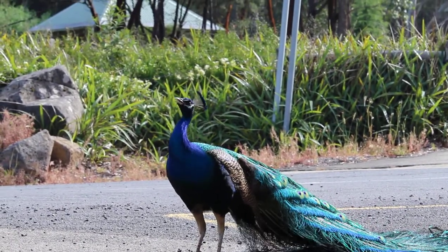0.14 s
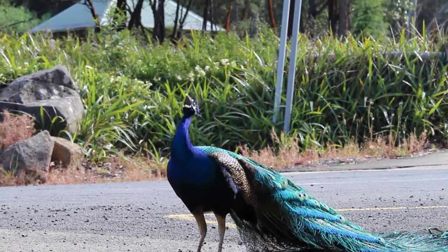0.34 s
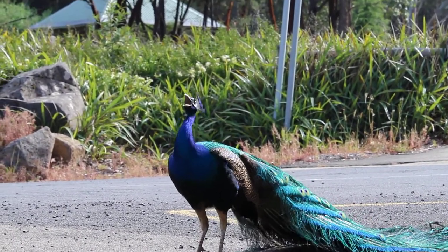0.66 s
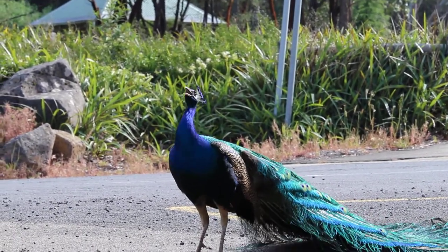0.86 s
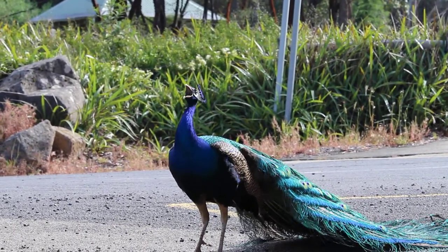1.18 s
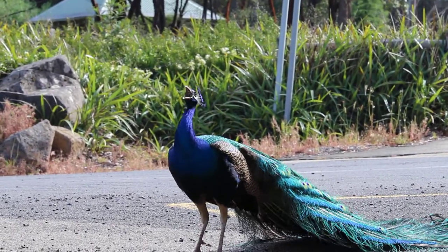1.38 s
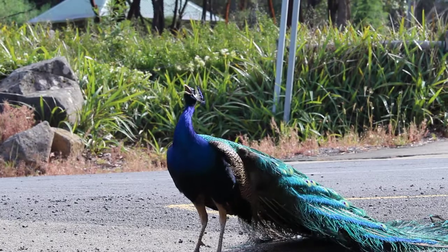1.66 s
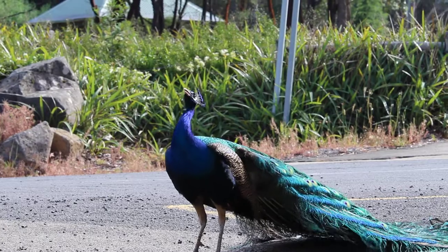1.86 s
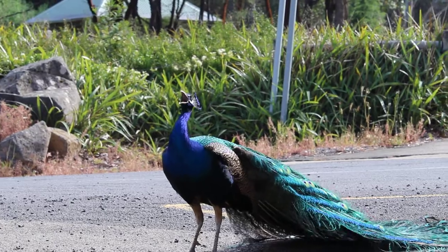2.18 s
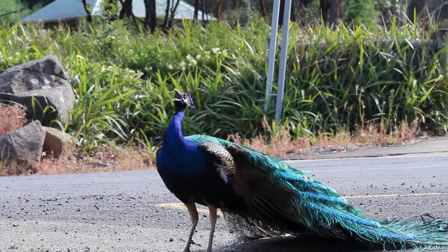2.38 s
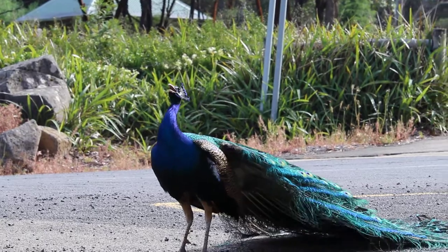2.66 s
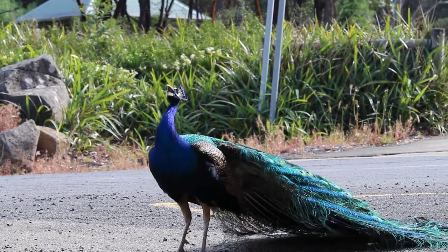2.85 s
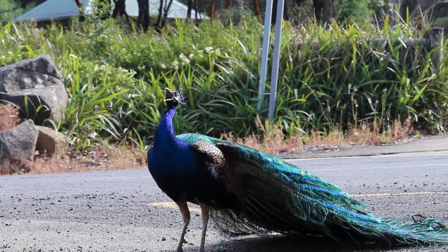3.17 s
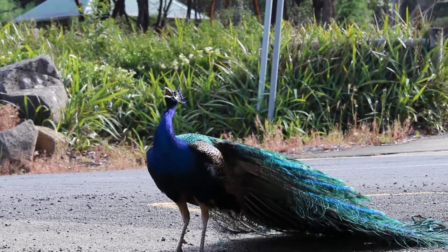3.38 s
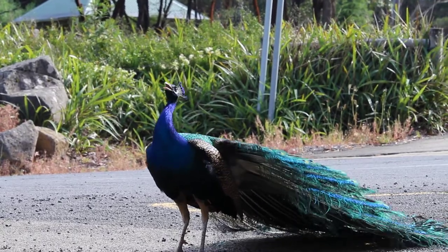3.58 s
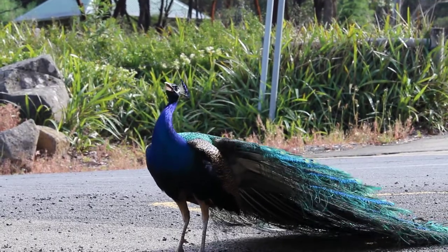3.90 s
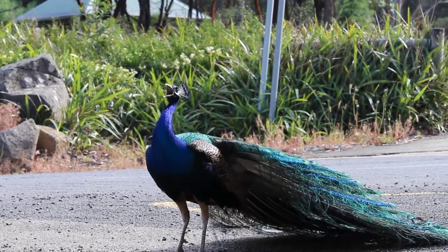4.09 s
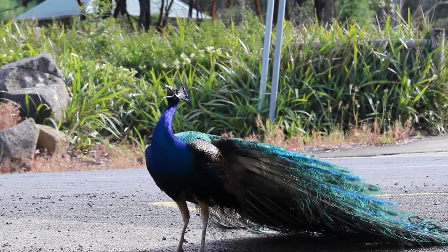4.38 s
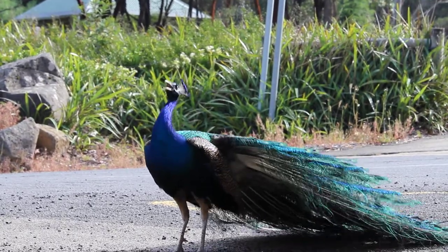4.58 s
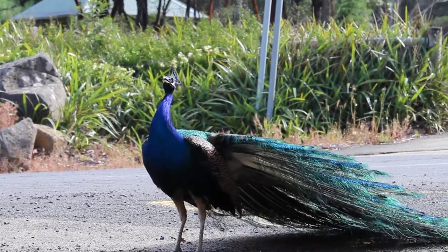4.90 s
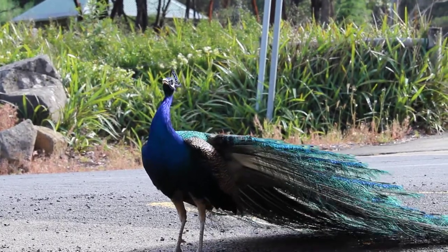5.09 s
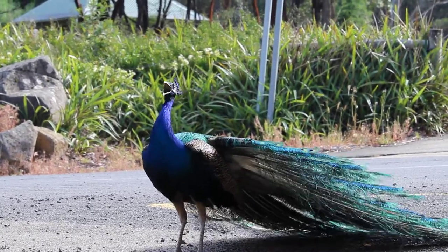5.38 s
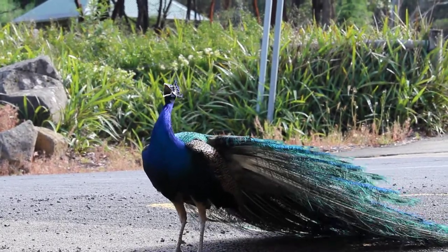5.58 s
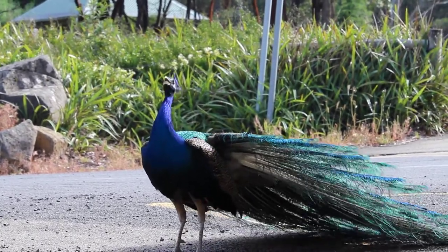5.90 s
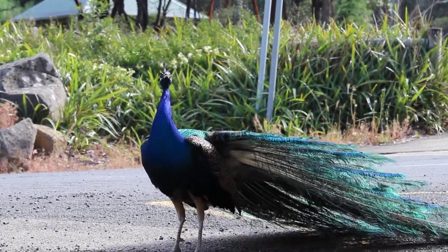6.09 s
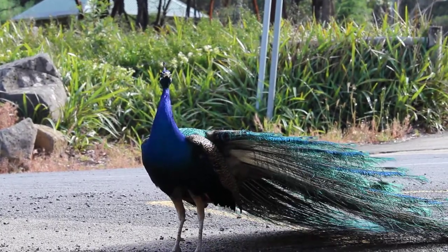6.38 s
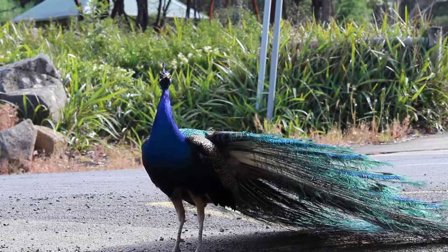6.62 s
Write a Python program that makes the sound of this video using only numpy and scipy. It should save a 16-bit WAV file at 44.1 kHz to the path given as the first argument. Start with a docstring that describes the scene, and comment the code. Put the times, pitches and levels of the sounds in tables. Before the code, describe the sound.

Six piercing, nasal peacock cries arch up and down about once a second, echoing off the roadside over low rumble and light microphone wind.

```python
"""Peacock beside a road

A peacock gives six loud arched calls: a stack of overtones that rises and falls through windpipe and beak, with
strong echoes off the road and nearby surfaces. Behind it: filtered-noise traffic, an idling engine summed from
its orders, puffs and roar of wind on the microphone, and a cricket as a pulsed high tone.
An automatic gain control ducks during each call and creeps back up."""
import sys
import numpy as np
from scipy import signal
from scipy.fft import rfft, irfft, next_fast_len
from scipy.io import wavfile
from scipy.ndimage import uniform_filter1d, map_coordinates

SR = 44100
rng = np.random.default_rng(int(sys.argv[2]) if len(sys.argv) > 2 else 0)


def store_wav(level_fs):
    """Save 16-bit WAV to argv[1]."""
    pcm = np.round(np.clip(np.atleast_2d(level_fs), -1, 1) * 32767)
    wavfile.write(sys.argv[1], SR, pcm.T.astype(np.int16))


def to_linear_factor(level_db):
    """Convert decibel levels (scalar or array-like) to linear amplitude factors."""
    exponent = np.asarray(level_db, float) / 20
    return 10 ** exponent


N = 297523


def along(points, hz):
    """(frequency [Hz], value) points read on a log frequency axis."""
    f, v = np.transpose(points)
    return np.interp(np.log(hz + 1), np.log(f + 1), v)


def wobble(rate_hz):
    """A smooth random curve through rate_hz knots a second."""
    knots = rng.standard_normal(int(N * rate_hz / SR) + 4)
    return map_coordinates(knots, [np.arange(N) * rate_hz / SR])


def filtered(x, response):
    """x times a complex response of frequency."""
    m = next_fast_len(N + SR // 2)
    return irfft(rfft(x, m) * response(np.fft.rfftfreq(m, 1 / SR)), m)[:N]


def noise(spectrum):
    """Coloured noise of rms 1."""
    x = filtered(rng.standard_normal(N), lambda hz: to_linear_factor(along(spectrum, hz)))
    return x / np.std(x)


def bump(t, centre_s, half_s):
    """Bell curve in time with peak 1."""
    return np.exp(-((t - centre_s) / half_s) ** 2)


def posture(pitch_hz, past):
    """Effort, treble and beak resonance [dB] follow pitch, on one path going up and another going down."""
    # pitches at which the settings are given [Hz]
    steps_hz = [610, 660, 700, 735, 760, 785, 810, 830, 850]
    # settings at those pitches: (effort [dB], treble [dB], beak resonance [dB])
    rising = [(-7, -7.5, -22), (-8, -9.5, -24), (-6.5, -2, -30.5), (-5.5, -4, 2.5), (-4.5, -8.5, 8.5),
              (-3.5, -5, -1.5), (-3.5, -2, -10), (-11, -0.5, -9), (-4.5, 0.5, -29)]
    falling = [(-10, -18, -2), (-10, -11, 2), (-12, -3, 10), (-8.5, -1, -10), (-5.5, -4.5, 2.5),
               (-10, 3, 16.5), (-5, -2.5, 7.5), (-6, 3, -0.5), (-12.5, 0, -55)]
    blends = []
    for up, down in zip(np.transpose(rising), np.transpose(falling)):
        up_db, down_db = np.interp(pitch_hz, steps_hz, up), np.interp(pitch_hz, steps_hz, down)
        blends.append((1 - past) * up_db + past * down_db)
    return blends


def tract_db(hz, treble_db, beak_db, brass_db):
    """Windpipe and open beak boost or damp each overtone by its frequency."""
    # windpipe colour: (frequency [Hz], gain [dB])
    windpipe = [(600, 15.5), (740, -10.5), (840, 4), (1250, 1), (1380, 2), (1500, -0.5), (1690, -3.5),
                (1900, -2), (2100, -1), (2300, 2.5), (2480, 1.5), (2800, 1), (3080, -1), (3350, -4),
                (4100, -4), (4600, -0.5), (5300, -11.5), (6500, 0.5), (7400, 1.5), (8600, -4), (9200, -2.5),
                (11000, -7.5), (15000, -18.5)]
    mouth_hz, mouth_width_hz = 3080, 330
    brass_hz, brass_width_hz = 8500, 2200
    colour_db = along(windpipe, hz)
    colour_db = colour_db + np.clip(beak_db, -12, 10) * np.exp(-((hz - mouth_hz) / mouth_width_hz) ** 2)
    colour_db = colour_db + treble_db * np.clip(hz / 3500 - 1, 0, 1)
    return colour_db + brass_db * np.exp(-((hz - brass_hz) / brass_width_hz) ** 2)


def peacock():
    """Steady membrane cycles as overtones through windpipe and beak, with a little breath pulsing at the pitch."""
    # the voice: (multiple of the pitch, level [dB])
    overtones = [(1, -13.5), (2, -3.5), (3, -0.5), (4, -8.5), (5, -10), (6, -12.5), (7, -13), (8, -14),
                 (9, -18), (10, -22.5), (11, -18.5), (12, -22.5), (13, -22), (14, -21.5), (15, -22),
                 (16, -30), (17, -26), (18, -33), (19, -32), (20, -44), (21, -44), (22, -45), (23, -46)]
    # pitch arch of each call: (time [s], pitch [Hz])
    arches = [
        [(.183, 617), (.204, 657), (.231, 717.4), (.288, 752), (.336, 732), (.354, 773), (.387, 812),
         (.435, 836.8), (.501, 838), (.573, 812), (.726, 749.7), (.752, 673)],
        [(1.045, 600), (1.069, 701), (1.09, 719), (1.15, 776.2), (1.258, 813), (1.315, 834.8), (1.375, 823),
         (1.471, 793), (1.561, 738), (1.582, 687)],
        [(1.903, 609), (1.924, 676), (1.951, 729), (2.023, 779), (2.099, 813.7), (2.2, 850.8), (2.257, 841),
         (2.372, 793.3), (2.467, 735.4), (2.48, 675)],
        [(2.84, 611), (2.879, 707), (2.948, 767.6), (3.065, 817.6), (3.128, 842.3), (3.231, 823.5),
         (3.335, 783.5), (3.41, 742), (3.434, 720), (3.448, 675)],
        [(3.9, 602), (3.948, 703), (4.011, 748), (4.065, 783), (4.128, 803.3), (4.2, 828.8), (4.281, 829.4),
         (4.404, 787.2), (4.524, 725), (4.548, 705), (4.56, 644)],
        [(5.14, 580), (5.16, 637), (5.197, 697), (5.271, 739.6), (5.344, 781), (5.464, 821.8), (5.551, 819),
         (5.629, 795), (5.782, 726.8), (5.83, 685), (5.842, 645)],
    ]
    # departures of each call: (rising level [dB], falling level [dB], treble [dB],
    # treble surge at the top [dB], windpipe length over its usual [ratio])
    manner = [(-0.5, -0.1, -2, 13.5, 1.005), (2.1, 0, 0.9, -3.5, .995), (0.7, 0.2, 0.7, 1.5, .995),
              (1.1, 0, 1, 5, .995), (-0.8, -0.3, 0.5, 10, 1.005), (0.5, 0.1, 0.9, 12, 1.0214)]
    turn_s, surge_half_s = 0.02, 0.032
    low_up_db, low_down_db = -1.5, 2  # the two lowest overtones gain as the call turns down
    # the first call slackens for a moment, then pushes back in hard
    falter_s, falter_half_s, falter_db, falter_treble_db = 0.304, 0.026, -4.5, -3
    kick_s, kick_half_s, kick_db, kick_treble_db = 0.393, 0.041, 4, 3.5

    out, flutter = np.zeros(N), wobble(120)
    air = noise([(500, -45), (2000, -0.5), (4000, -7.5), (6500, -3), (10000, -21), (15000, -43)])
    # head moves stir the lowest overtones least
    shimmer_db = [4.8 * np.tanh(0.15 + (k / 6) ** 2) * np.exp(-(k / 24) ** 2) * wobble(35)
                  for k, _ in overtones]
    for arch, (up_db, down_db, bright_db, surge_db, length) in zip(arches, manner):
        s, arch_hz = np.transpose(arch)
        begin_s, end_s, top_s = s[0] - 0.003, s[-1], s[np.argmax(arch_hz)]
        at = np.arange(round(begin_s * SR), round(end_s * SR))
        t = at / SR
        pitch = np.interp(t, s, arch_hz)
        past = 0.5 + 0.5 * np.tanh((t - top_s) / turn_s)  # 0 rising, 1 falling

        slack, kick = bump(t, falter_s, falter_half_s), bump(t, kick_s, kick_half_s)
        brass_db = surge_db * bump(t, top_s, surge_half_s)
        effort_db, treble_db, beak_db = posture(pitch * length, past)
        effort_db = effort_db + (1 - past) * up_db + past * down_db + falter_db * slack + kick_db * kick
        treble_db = treble_db + bright_db + falter_treble_db * slack + kick_treble_db * kick

        # rounded glide, with a waver that is widest at first
        waver = (0.0015 + 0.0068 * np.exp(-(t - begin_s) / 0.057)) * flutter[at]
        pitch = uniform_filter1d(pitch, size=400, mode="nearest") * (1 + waver)
        phase = 2 * np.pi * np.cumsum(pitch) / SR

        onset = np.clip((t - begin_s) / 0.052, 0, 1)
        ending = np.clip((end_s - t) / 0.0034, 0, 1)
        onset = onset * to_linear_factor(3.6 * (1 - onset) * flutter[at])  # the membranes catch unevenly at first
        # every other cycle starts weak
        onset = onset * (1 + 0.9 * np.exp(-(t - begin_s) / 0.009) * np.cos(phase / 2))

        voice = 0
        for (k, db), stir_db in zip(overtones, shimmer_db):
            hz = k * pitch * length  # a longer pipe meets each overtone further up its colour
            low_db = (k < 3) * ((1 - past) * low_up_db + past * low_down_db)
            level_db = db + low_db + tract_db(hz, treble_db, beak_db, brass_db) + stir_db[at]
            voice = voice + to_linear_factor(level_db) * np.cos(k * phase + 0.285 * k * k)

        # hoarse at both ends
        rasp_db = 18 * np.exp(-(t - s[0]) / 0.015) - 18 * (t - s[0]) + 10 * np.exp(-(end_s - t) / 0.055)
        breath = to_linear_factor(-28.0 + rasp_db + treble_db) * (1 + 0.39 * np.cos(phase)) * air[at]
        out[at] = to_linear_factor(effort_db) * onset * ending * (voice + breath)
    return out


def early(x):
    """Direct sound plus first echoes, which lose treble; gliding overtones swell and dip through the comb."""
    # early copies of the voice: (delay [ms], gain [ratio])
    echoes = [(0.911, 0.1), (1.638, 0.12), (3.064, -0.21), (4.292, -0.15), (7.022, -0.12), (9.105, -0.12),
              (9.859, 0.21), (11.686, -0.22), (12.234, 0.35), (12.667, -0.3), (12.894, -0.23),
              (13.588, -0.29), (21.213, 0.024), (21.754, -0.14), (31.785, 0.05)]

    def comb(hz):
        return 1 + sum(gain * np.exp(-2j * np.pi * hz * ms / 1000 - (hz / 12000) ** 2)
                       for ms, gain in echoes)
    return filtered(x, comb)


def tail(x, decays, start_ms):
    """A diffuse answer in which each frequency dies at its own speed."""
    hz, t, z = signal.stft(rng.standard_normal(SR), SR, nperseg=256)
    fade = to_linear_factor(-60 * t / along(decays, hz)[:, None])
    h = signal.istft(z * fade, SR, nperseg=256)[1]
    h = np.pad(h / np.linalg.norm(h), (round(start_ms * SR / 1000), 0))
    return signal.fftconvolve(x, h)[:N]


def traffic():
    """Road rumble and tyre rush that swell as a car nears, and a slightly unsteady idling engine."""
    # rumble course: (time [s], level [dB])
    course = [(0, -38.5), (1, -39), (1.998, -41), (3.002, -38), (4, -40.5), (5.9, -37), (6.299, -40),
              (6.45, -36), (6.65, -32.5), (6.75, -33.5)]
    # noise colours: (frequency [Hz], relative density [dB per Hz])
    rumble_colour = [(15, -37), (25, -33), (92, -7.5), (151, -11), (285, -8.5), (334, -10), (425, -7),
                     (600, -14.5), (780, -26), (1320, -120)]
    rush_colour = [(290, -26), (500, -8), (906, -7), (1020, -7.5), (1580, -17.5), (1920, -15.5),
                   (2300, -18.5), (2790, -19.5), (3710, -25), (4570, -27.5), (4930, -29), (11000, -47),
                   (14300, -74), (22000, -120)]
    # engine orders: (multiple of the base rate, level [dB])
    idle = [(1, -44), (2, -43.5), (3, -56), (4, -48), (6, -49.5), (9, -47)]
    rush_mid_db, rush_follows, base_hz = -40.5, 0.66, 45.6  # rush takes a share of the rumble's swings

    t = np.arange(N) / SR
    s, points_db = np.transpose(course)
    rumble_db = np.interp(t, s, points_db)
    swing_db = rumble_db - np.median(points_db)
    rush_db = rush_mid_db + rush_follows * swing_db
    rumble = to_linear_factor(rumble_db) * noise([(10, -60)] + rumble_colour + [(1400, -130)])
    rush = to_linear_factor(rush_db + 1.2 * wobble(10)) * noise([(250, -40)] + rush_colour)

    phase = 2 * np.pi * np.cumsum(base_hz * (1 + 0.01503 * wobble(5))) / SR
    engine = sum(np.sqrt(2) * to_linear_factor(db + 2.2 * wobble(12)) * np.sin(k * phase + k * k) for k, db in idle)
    surge_db = 1.6 * wobble(7)  # the air carries rumble and engine unevenly
    return to_linear_factor(surge_db) * (rumble + to_linear_factor(swing_db) * engine) + rush


def wind():
    """Lumpy low roar and short thuds of air against the microphone."""
    # thuds: (start [s], level [dB], frequency [Hz], length [s])
    puffs = [(4.179, -26, 152, 0.033), (4.245, -25, 146, 0.03), (4.297, -25, 89.5, 0.039),
             (4.37, -23.5, 120, 0.035), (4.412, -28, 81.7, 0.04), (4.542, -29.5, 50, 0.03),
             (4.614, -32, 97.4, 0.04), (4.777, -36, 59.8, 0.035), (4.934, -30, 60, 0.022)]
    # roar swells: (time [s], level [dB], half length [s])
    gusts = [(.4, -66, 0.36), (1.152, -45, 0.17), (3.869, -36, 0.074), (4.305, -35.5, .16),
             (4.95, -56, 0.32), (6, -49, 0.29), (6.62, -45, .12)]
    calm_db = -47.5  # roar between gusts

    thuds, t = np.zeros(N + SR), np.arange(SR // 5) / SR
    churn = noise([(30, -27), (60, 5.5), (200, -8.5), (320, -16.5), (700, -58)])
    for s, db, hz, length_s in puffs:
        u = t / max(length_s, 0.005) * 2.3
        at = round(s * SR)
        push = np.sin(2 * np.pi * hz * t) + 0.98 * churn[at:][:len(t)]
        thuds[at:][:len(t)] += to_linear_factor(db) * (u * np.exp(1 - u)) ** 2 * push

    swell = sum(to_linear_factor(db) * bump(np.arange(N) / SR, s, half_s) for s, db, half_s in gusts)
    strength = (to_linear_factor(calm_db) + swell) * to_linear_factor(2.7 * wobble(7.9))
    return thuds[:N] + strength * noise([(15, -27), (40, 2.0), (120, -13), (250, -8), (600, -67)])


def cricket():
    """One wing stroke after another rings a narrow high tone."""
    tone_hz, strokes_hz = 4484, 48.8
    strokes = 2 * np.pi * np.cumsum(strokes_hz * (1 + 0.004 * wobble(3.05))) / SR
    gate = (0.5 + 0.5 * np.sin(strokes)) ** 0.5 + 0.12
    tone = np.sin(2 * np.pi * np.cumsum(tone_hz * (1 + 0.00066 * wobble(19))) / SR)
    return to_linear_factor(-51.0 + 0.38 * wobble(3.26) + 3.0 * wobble(28)) * gate * tone


def scene():
    """The bird in its echoes over the roadside background."""
    # scattered tail nearby: (frequency [Hz], t60 [s])
    surrounds = [(600, 0.51), (1500, 0.3), (2500, 0.23), (4500, 0.18), (10000, 0.15)]
    # far trees and walls: (frequency [Hz], t60 [s])
    far = [(600, 4.1), (2000, 1.03), (5000, 1.1), (10000, 0.39)]
    bird = peacock()
    near_tail = to_linear_factor(-9.0) * tail(bird, surrounds, start_ms=15)
    far_tail = to_linear_factor(-30) * tail(bird, far, start_ms=73)
    voice = early(bird) + near_tail + far_tail
    return (voice + traffic() + wind() + cricket())[None]


def gain_control(x, knee_db, ratio, fall_db_per_s, rise_db_per_s):
    """Every 5 ms the gain steps toward what the level asks for, within its fall and rise rates."""
    step = 220  # samples
    power = np.abs(uniform_filter1d(x ** 2, 2600))[::step]
    level_db = 10 * np.log10(power + 1e-12)
    wanted_db = -ratio * np.clip(level_db - knee_db, 0, None)
    gain_db = np.full(len(wanted_db), -1.5)
    for i in range(1, len(gain_db)):
        change_db = wanted_db[i] - gain_db[i - 1]
        gain_db[i] = gain_db[i - 1] + np.clip(change_db, -fall_db_per_s * step / SR, rise_db_per_s * step / SR)
    return x * to_linear_factor(np.interp(np.arange(N), np.arange(len(gain_db)) * step, gain_db))


def top_cut(x):
    """Nothing passes above the cut-off."""
    return signal.sosfilt(signal.butter(12, 15710, fs=SR, output="sos"), x)


def record(dry):
    """Gain control, then a soft ceiling that rounds off the peaks."""
    x = gain_control(dry[0], knee_db=-20.5, ratio=0.63, fall_db_per_s=50, rise_db_per_s=18.0)
    x = x / (1 + np.abs(x / 1.03) ** 8) ** (1 / 8)
    return top_cut(x[None])


dry = scene()
out = record(dry)
store_wav(out)
```